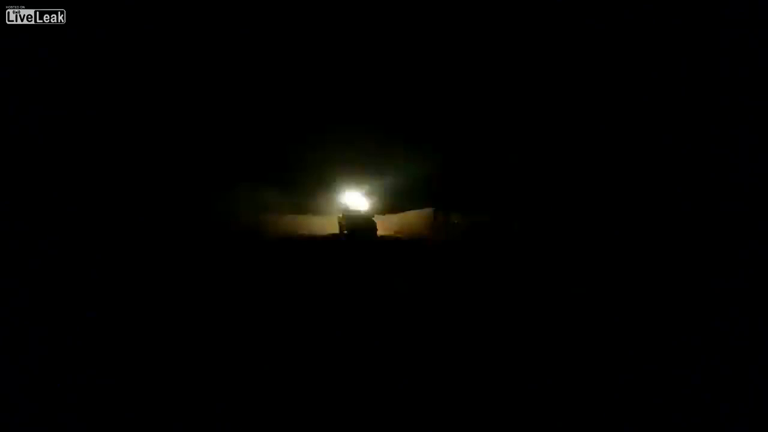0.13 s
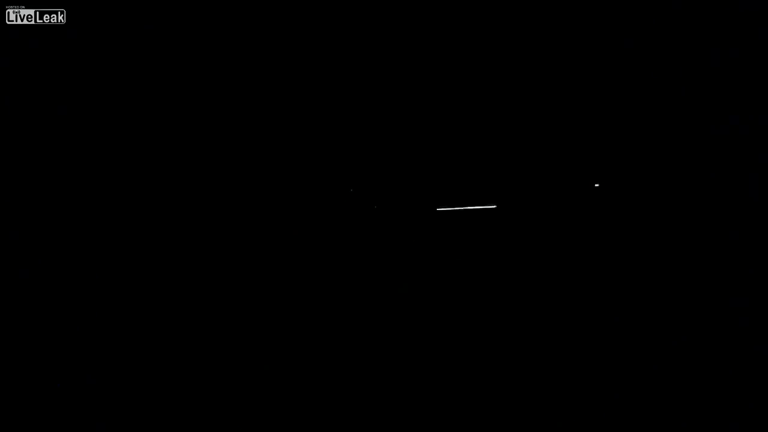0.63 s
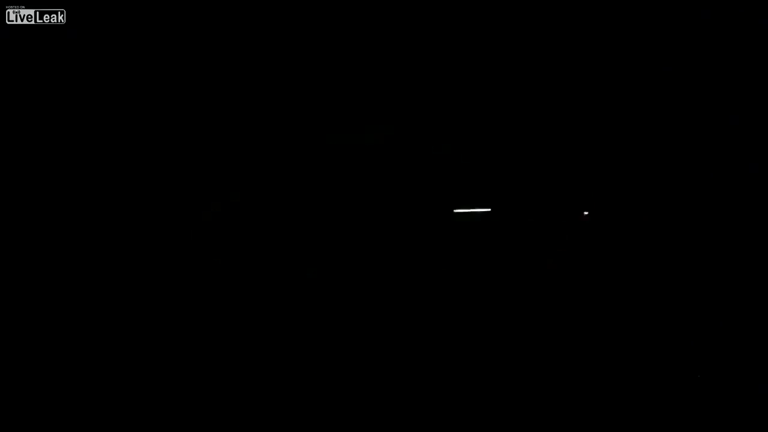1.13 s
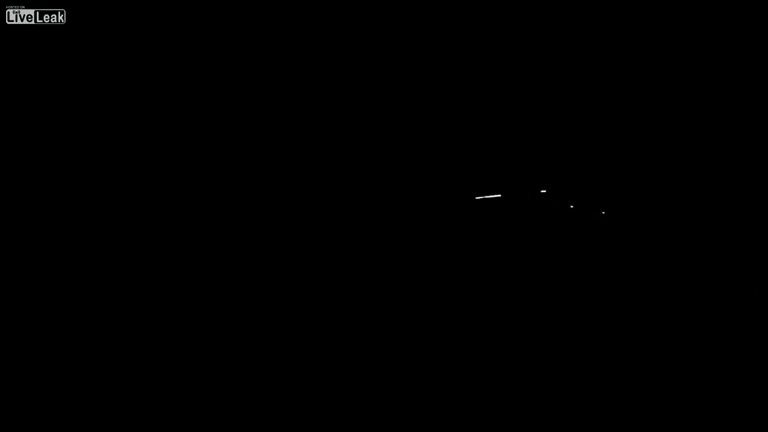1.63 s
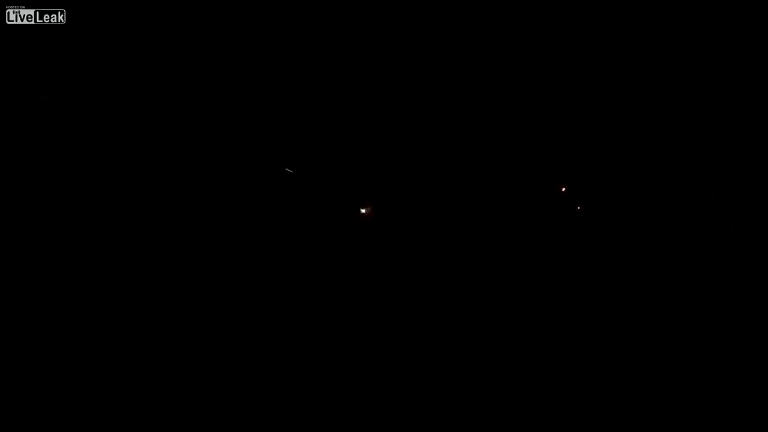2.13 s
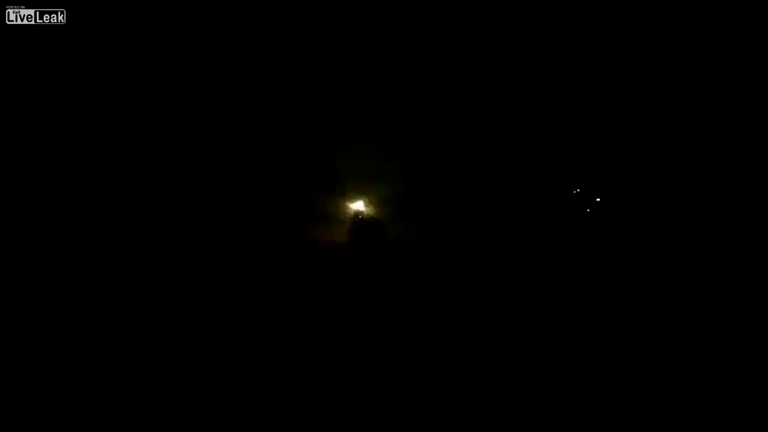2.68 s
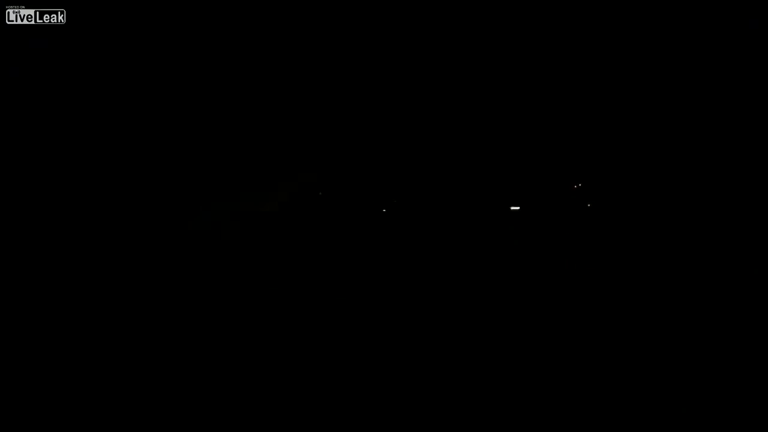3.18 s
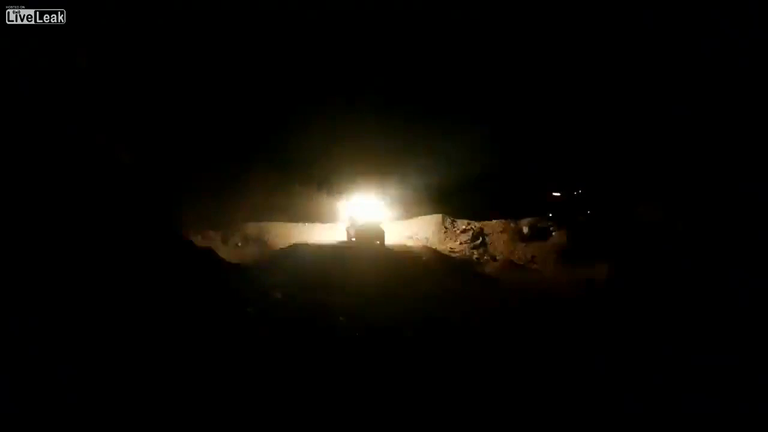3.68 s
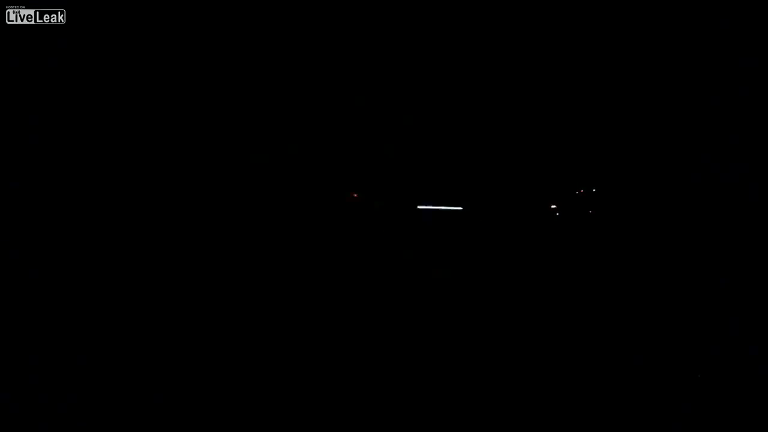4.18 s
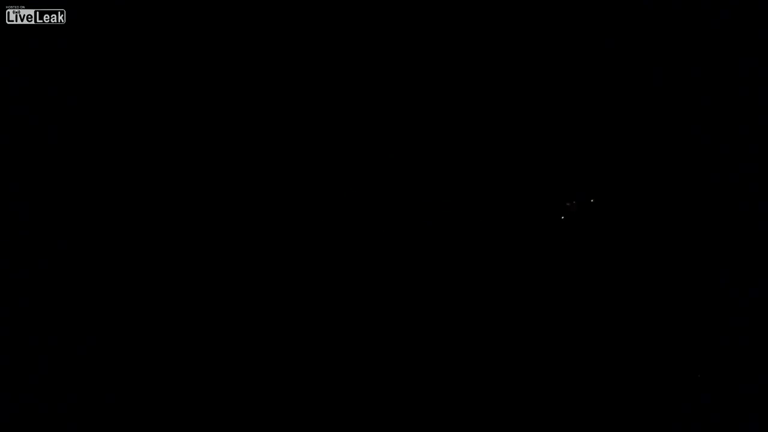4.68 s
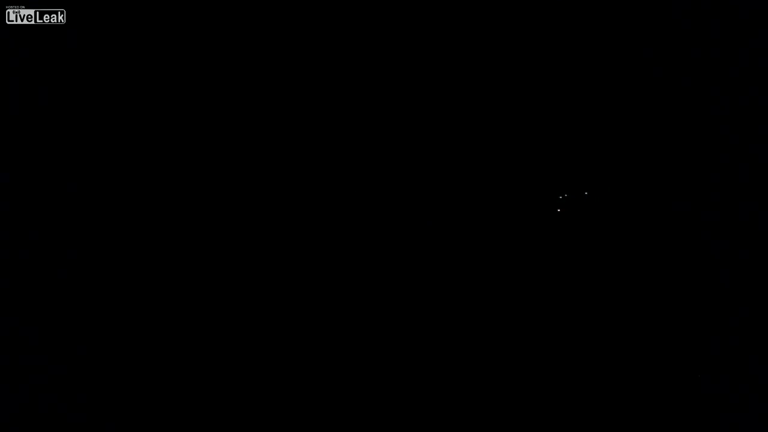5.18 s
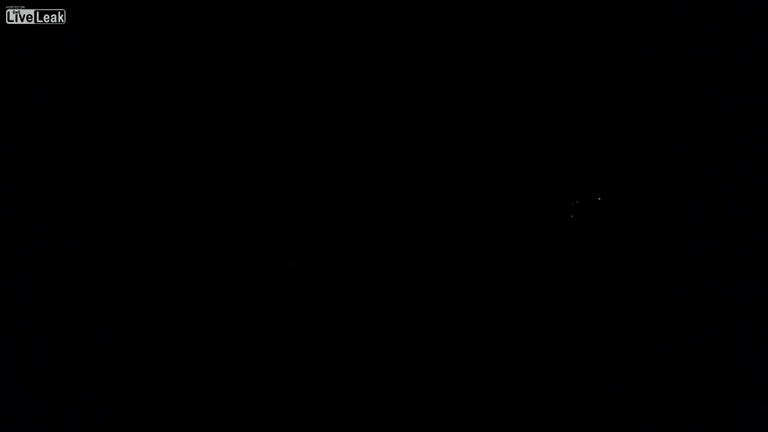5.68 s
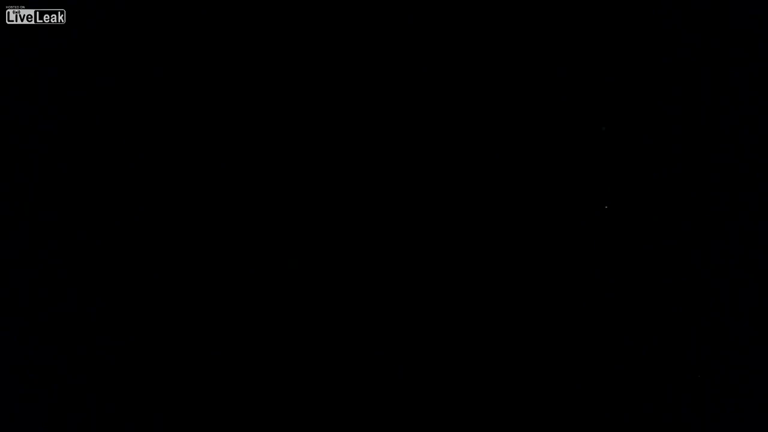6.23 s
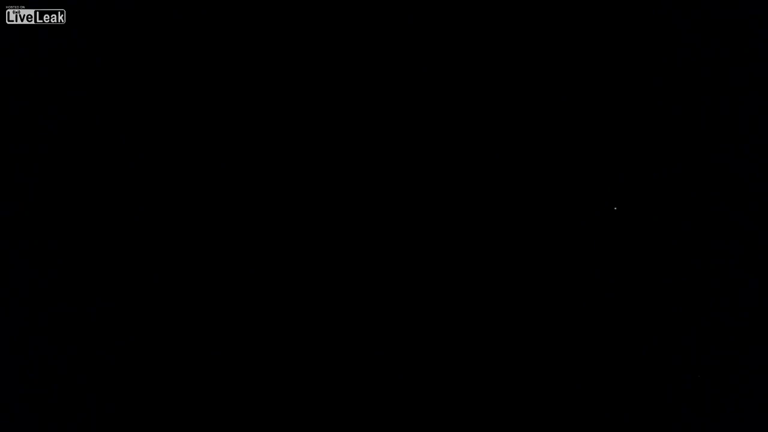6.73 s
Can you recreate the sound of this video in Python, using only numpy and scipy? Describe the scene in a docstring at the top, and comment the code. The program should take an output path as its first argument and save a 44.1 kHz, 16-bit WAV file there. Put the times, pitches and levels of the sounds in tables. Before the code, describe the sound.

A close machine gun on a vehicle hammers steadily in open dark country, blasts slightly uneven in strength and tone, overlapping with slapback from banks and distant faces. The mono microphone overloads and clamps the peaks, with thin bass. After the last round a noisy echo decays over a couple of seconds into quiet night air and light hiss, with tiny brass ticks, then a single muffled far-off shot.

```python
"""A machine gun fires one long burst in the open at night, near a microphone with hard gain control.
Each blast rings the gun pit's low modes, and near banks excite them again; noise bands that die in
three stages form the echo of ground, slope and valley, and far faces return short noisy cracks.
Spent cases tick and ring as the echo fades, then another gun fires once far away: a dulled N-wave."""
import sys
import numpy as np
from scipy import signal
from scipy.fft import rfft, irfft, next_fast_len
from scipy.io import wavfile

SR = 44100
rng = np.random.default_rng(int(sys.argv[2]) if len(sys.argv) > 2 else 0)


def transcribe(signal):
    """Save signal, clipped to [-1, 1], as a 16-bit WAV file at the path in sys.argv[1]."""
    frames = np.atleast_2d(signal).T
    limited = np.clip(frames, -1, 1)
    pcm = np.round(limited * 32767).astype(np.int16)
    wavfile.write(sys.argv[1], SR, pcm)


def invert_db(level):
    """Linear amplitude ratio for a level in decibels (20 dB per decade), elementwise."""
    return 10 ** (np.asarray(level, dtype=float) / 20)


N = 301725

# muzzle blasts of the burst: start_s, level_db
BLASTS = [(0.263, -2.5), (0.3592, -6.5), (0.458, -8.5), (0.5605, -9), (0.6538, -9.5), (0.7466, -7.5),
          (0.845, -4.5), (0.9427, -6), (1.0405, -2), (1.1355, -6), (1.2323, -5.5), (1.3272, -8),
          (1.4228, -4), (1.519, -2), (1.6159, -4.5), (1.712, -8), (1.809, -6), (1.9024, -5), (1.9905, -8),
          (2.0882, -7.5), (2.1798, -8), (2.2678, -6.5), (2.359, -11), (2.4478, -6), (2.5429, -2.5),
          (2.6352, -4.5), (2.7309, -4), (2.827, -7), (2.9245, -5), (3.0154, -4.5), (3.104, -7.5),
          (3.1966, -2), (3.29, -5.5), (3.3819, -6), (3.479, -6.5), (3.5751, -4), (3.6659, -7), (3.7597, -1),
          (3.8476, -6), (3.9355, -3.5), (4.031, -6.5), (4.1237, -8.5), (4.2175, -6.5), (4.3123, -7.5)]
# edges of the colour regions: boom lies between the first two, bark between the last two
COLOUR_HZ = (240, 500, 1100)


def band(x, low_hz, high_hz):
    """Band-limiting: the power of white noise is proportional to bandwidth, so rms 1 is restored."""
    low, high = np.clip([low_hz, high_hz], 15, .45 * SR)
    y = signal.sosfilt(signal.butter(3, [low, high], "band", fs=SR, output="sos"), x)
    return y / np.sqrt(2.2 * (high - low) / SR)


def clicks(seconds, db):
    """Impulsive excitation: single samples at given times and levels."""
    out = np.zeros(N)
    places = np.minimum(np.round(np.asarray(seconds) * SR).astype(int), N - 1)
    np.add.at(out, places, invert_db(db))
    return out + 1e-18


def ring(x, hz, t60):
    """Damped resonance: a unit click sets a sine of initial height 1 ringing for t60 seconds."""
    radius, angle = invert_db(-60 / (t60 * SR)), 2 * np.pi * hz / SR
    return signal.lfilter([0, np.sin(angle)], [1, -2 * radius * np.cos(angle), radius ** 2], x)


def dying_power(x, t60):
    """Energy decay: the powers of incoherent arrivals add up and die exponentially."""
    return signal.lfilter([1], [1, -invert_db(-120 / (t60 * SR))], x ** 2)


def shaped_noise(spectrum):
    """Stationary noise: white noise weighted by a spectrum and scaled to rms 1."""
    hz, db = np.transpose(spectrum)
    size = next_fast_len(N)
    log_hz = np.log(np.arange(size // 2 + 1) * SR / size + 1)
    gain = invert_db(np.interp(log_hz, np.log(hz), db))
    out = irfft(rfft(rng.standard_normal(size)) * gain, size)[:N]
    return out / np.std(out)


def drift(rate_hz):
    """Slow random modulation: white noise through two equal low-pass poles, scaled to spread 1."""
    pole = np.exp(-2 * np.pi * rate_hz / SR)
    slow = signal.lfilter([1], [1, -2 * pole, pole ** 2], rng.standard_normal(N + SR))[SR:]
    return slow / np.std(slow)


def lumps(rate_per_s, decay_s, share):
    """Shot noise: a power gain of mean 1 of which a share comes in random dying lumps."""
    grains = (rng.random(N) < rate_per_s / SR) * rng.exponential(1, N)
    lumpy = signal.lfilter([1], [1, -np.exp(-1 / (decay_s * SR))], grains)
    return 1 + np.clip(share, 0, 1) * (lumpy / lumpy.mean() - 1)


def aimed():
    """Directivity: boom and bark follow the barrel's aim; the hiss is steadier than the blast."""
    # the barrel swings across the pit: start_s, boom_db (above the blast)
    aim = [(.26, 0.5), (0.7, 3.5), (1.2, -0.5), (1.7, 4.5), (2.15, 2), (2.25, 1.5), (2.4, 0), (2.9, 2.5),
           (3.05, -3), (3.6, -6.5), (4.0, 1), (4.3, 0)]
    usual_db = -7.3   # blast of a usual round
    s, db = np.transpose(BLASTS)
    boom_db = np.interp(s, *np.transpose(aim))
    bark_db = 0.45 - 0.33 * boom_db   # the bark gains part of what the boom loses
    hiss_db = 0.6 + (0.74 - 1) * (db - usual_db)   # hiss keeps 0.74 of a round's extra decibels
    return s, db, boom_db, bark_db, hiss_db


def night_air():
    """Ambient noise: a steady random pressure with a sloping spectrum."""
    # spectrum of the night air: frequency_hz, relative_db_per_hz
    night = [(24, -73), (40, -3), (129, 2.5), (253, -6.5), (560, -2.5), (900, 0), (2100, -6.5),
             (2600, -18.5), (3340, -21), (3780, -30), (4760, -25), (6000, -56), (7800, -74), (13200, -120)]
    return invert_db(-39.5) * shaped_noise(night)


def action():
    """Impact noise: parts touch faintly, then the bolt slams home; each excites a dying noise band."""
    # parts of the action touch before firing: start_s, level_db
    touches = [(0.1338, -44), (0.1717, -43), (0.195, -40), (0.2166, -36), (0.234, -36)]
    rattle_t60_s, bolt_t60_s = 0.26, 0.33
    bolt_s, bolt_db = .2487, -14.5
    rattle = np.sqrt(dying_power(clicks(*np.transpose(touches)), rattle_t60_s))
    slam = np.sqrt(dying_power(clicks([bolt_s], bolt_db), bolt_t60_s))
    rattle_noise = band(rng.standard_normal(N), 2720, 8800)
    slam_noise = band(rng.standard_normal(N), 686, 8700)
    return rattle * rattle_noise + slam * slam_noise


def boom():
    """Modal resonance: each round, and each return from the banks, sets the gun pit ringing."""
    # rings of the gun pit: frequency_hz, level_db, t60_s
    pit_modes = [(208.7, 12, 0.081), (252, -2, 0.15), (298.7, 4, 0.11), (322.7, 7.5, 0.13), (449, 6, 0.092),
                 (666, 7.5, 0.091), (750, 8.5, 0.057), (929, 7.5, 0.043), (1398, 4, 0.1),
                 (1925, 9.5, 0.038)]
    # near banks that repeat the boom: delay_s, level_db
    banks = [(.019, -19), (.031, -9), (.041, -2), (.061, -7.5), (.072, -10), (.13, -7), (.17, -13),
             (.22, -5), (.27, -8)]
    mode_spread_db = 3.5   # no two rounds shake the pit alike
    bank_loss_db_per_octave, bank_dull_hz = 3, 330   # earth banks swallow the upper rings
    s, db, boom_db, bark_db, _ = aimed()
    out = np.zeros(N)
    chance_db = rng.normal(0, mode_spread_db, (len(s), len(pit_modes)))
    for k, (hz, level_db, t60) in enumerate(pit_modes):
        colour_db = (0, boom_db, bark_db, 0)[np.searchsorted(COLOUR_HZ, hz)]
        struck_db = db + colour_db + level_db + chance_db[:, k]
        loss_db = bank_loss_db_per_octave * max(np.log2(hz / bank_dull_hz), 0)
        returns = sum(clicks(s + lag, struck_db + bank_db - loss_db) for lag, bank_db in banks)
        out += ring(clicks(s, struck_db) + returns, hz, t60)
    return out


def gas_puffs(s, hiss_db):
    """Repeated excitation: gas and the cycling action renew the hiss of each round."""
    # renewals of the hiss: delay_s, level_db
    puffs = [(.0001, -4.5), (.0015, 2), (.003, -2.5), (0.01, -1), (0.023, -4.5), (.031, -29.5),
             (.052, -20.5)]
    late_s = rng.normal(0, 0.00051, (len(s), len(puffs)))
    uneven_db = rng.normal(0, 1.8, (len(s), len(puffs)))
    out = np.zeros(N)
    for k, (lag, puff_db) in enumerate(puffs):
        start = s + lag + late_s[:, k] * (lag > .005)   # only the later puffs vary in time
        out += clicks(start, hiss_db + puff_db + uneven_db[:, k])
    return out


def scatter():
    """Diffuse scattering: each half-octave band dies in three stages: near ground, slope, valley."""
    # scattered sound: frequency_hz, near_db, near_t60_s, slope_db, slope_t60_s, valley_db, valley_t60_s
    land = np.transpose([(49.4, -13, 0.77, -8, 1.5, -20.5, 2.4), (90.3, -15, 0.76, -11.5, 6.6, -21, 2.9),
                         (178, 11, 0.15, -3, 1.8, -35.5, 5.9), (384, 2.5, 0.83, -1.5, 0.97, -18, 3.15),
                         (785, 7, 0.19, -2.5, 1.6, -16, 3.83), (1300, 1.5, 0.5, -5, 1.6, -12.5, 3.4),
                         (2540, 1.5, 0.1, -4, 0.88, -5.5, 2.41), (3870, 4.5, 0.35, -4, 2.1, -26.5, 2.2),
                         (5210, -0.5, 0.23, -16, 1.5, -21, 2.1), (7120, -6.5, 0.14, -2.5, 0.72, -45, 1.2),
                         (9660, 2.5, 0.13, -15, 0.49, -40, 3.4), (15310, -4.5, 0.11, -27, .7, -85, 2.5)])
    same_below_hz = 2060   # well below this every round scatters alike, above it the air stirs each anew
    slope_ends_s, swell_s = .56, .03   # the slope stops at a crest; time constant of the far swell
    s, db, boom_db, bark_db, hiss_db = aimed()
    coloured = [clicks(s, db + colour_db) for colour_db in (0, boom_db, bark_db, 0)]
    bright = gas_puffs(s, db + hiss_db)
    grit = lumps(450, 0.00086, 0.33)   # stones and edges return separate grains
    clatter = lumps(68, 0.0055, 0.4)   # rocks on the slope return rough bursts
    # broken ground makes the echo roll: a power gain, spreads in dB
    roll = 10 ** ((0.52 * drift(3.5) + 0.8 * drift(23.0)) / 10)
    edges = 40 * 2 ** np.arange(0, 9.1, .5)
    white = rng.standard_normal((2, N))
    ground, t = rng.standard_normal((2, SR // 2)), np.arange(SR // 2) / SR
    out, answers = np.zeros(N), np.zeros((len(coloured), SR // 2))
    crest = round(slope_ends_s * SR)
    swell = np.exp(-1 / (swell_s * SR))
    for k, (low, high) in enumerate(zip(edges, edges[1:])):
        hz = np.sqrt(low * high)
        near_db, near_t60, slope_db, slope_t60, valley_db, valley_t60 = [
            np.interp(np.log(hz), np.log(land[0]), column) for column in land[1:]]
        same = 1 / (1 + (hz / same_below_hz) ** 2)
        near_answer = band(ground[k % 2], low, high) * invert_db(near_db - 60 * t / near_t60)
        part = np.searchsorted(COLOUR_HZ, hz)
        answers[part] += np.sqrt(same) * near_answer
        hill = dying_power(coloured[part], slope_t60)
        # each round's slope echo ends at the crest
        hill[crest:] -= invert_db(-120 * crest / SR / slope_t60) * hill[:-crest].copy()
        slope_power = invert_db(2 * slope_db) * np.maximum(hill, 0)
        valley_power = invert_db(2 * valley_db) * dying_power(coloured[part], valley_t60)
        # far ground answers late, so its share swells first
        far = signal.lfilter([1 - swell], [1, -swell], (slope_power, valley_power))
        power = far[0] * clatter + far[1] * roll
        power += (1 - same) * invert_db(2 * near_db) * dying_power(bright, near_t60) * grit
        out += band(white[k % 2], low, high) * np.sqrt(power)
    for blasts, answer in zip(coloured, answers):
        out += signal.fftconvolve(blasts, answer)[:N]
    return out


def far_faces():
    """Rough reflection: a face smears the shock over milliseconds into a short noisy crack."""
    # the front of each round, then far faces that return it as a short crack:
    # delay_s, frequency_hz, width_hz, level_db, half_length_s
    faces = [(.0001, 1300, 2400, 14, 0.0035), (.4055, 1900, 3000, 2, 0.0066),
             (.4345, 2230, 1200, 9, 0.0035), (.461, 2200, 1500, -6, 0.0024), (.511, 1300, 1500, -7, 0.0051),
             (.799, 1800, 1800, -23, .004), (.151, 1600, 1450, 0, 0.0017), (.187, 1600, 1000, -3, 0.021)]
    s, db = np.transpose(BLASTS)
    out, chance_db = np.zeros(N), rng.normal(0, 1.2, (len(s), len(faces)))
    # late in the burst the barrel turns to the far faces: 20 dB per second from 4.13 s
    facing_db = 20 * np.maximum(s - 4.13, 0)
    for k, (lag, hz, width_hz, face_db, half_length) in enumerate(faces):
        level_db = db + face_db + chance_db[:, k] + facing_db * (k > 0)
        window = np.hanning(round(2 * half_length * SR)) ** .5
        gate = signal.fftconvolve(clicks(s + lag, level_db), window)[:N]
        out += band(gate * rng.choice([-1., 1.], N), hz - width_hz / 2, hz + width_hz / 2)
    return out


def cases():
    """Modal impact: each spent case ticks on the ground and rings its modes with strengths of its own."""
    # spent cases land: start_s, ring_db, tick_db (above the ring)
    landings = [(5.384, -53, -1), (5.654, -47, -5), (5.822, -48, -14), (5.901, -54.5, 5), (6.02, -54, -8)]
    # modes of a case: frequency_hz, level_db, t60_s
    case_modes = [(4860, -8, .2), (4900, -5, .3), (6200, -12, .25), (6160, -10, .35), (8800, -14, .2)]
    tick_t60_s = .25
    s, db, tick_db = np.transpose(landings)
    chance_db = rng.normal(0, 2.2, (len(s), len(case_modes)))
    tick = np.sqrt(dying_power(clicks(s, db + tick_db), tick_t60_s))
    out = tick * band(rng.standard_normal(N), 2800, 5700)
    for k, (hz, level_db, t60) in enumerate(case_modes):
        out += ring(clicks(s, db + level_db + chance_db[:, k]), hz, t60)
    return out


def far_shot():
    """N-wave propagation: a shock dulled by the air, with ground echoes, a low thump and a short tail."""
    # ground echoes of the far shock: delay_s, level_db
    echoes = [(.0046, 0), (.0095, -6), (.0124, -4), (0.0153, -5), (.0203, -9), (.024, -10), (0.0268, -9)]
    arrival_s, shock_s, shock_db = 6.7781, .0014, -1.5
    soil_hz, air_hz = 700, 2770   # low-pass corners
    tail_db, tail_t60_s = -17.5, 0.24
    thump_hz, thump_db, thump_t60_s = 239, -12.5, 0.086   # the low push of the far muzzle blast
    shock = np.linspace(-1, 1, round(shock_s * SR))
    lag, echo_db = np.transpose(echoes)
    soil = signal.butter(2, soil_hz, fs=SR, output="sos")
    arrivals = clicks([arrival_s], shock_db)
    arrivals += signal.sosfilt(soil, clicks(arrival_s + lag, shock_db + echo_db))
    tail = np.sqrt(dying_power(clicks([arrival_s + .003], tail_db), tail_t60_s))
    tail = tail * band(rng.standard_normal(N), 110, 1475)
    thump = ring(clicks([arrival_s], thump_db), thump_hz, thump_t60_s)
    air = signal.butter(8, air_hz, fs=SR, output="sos")
    return signal.sosfilt(air, np.convolve(arrivals, shock)[:N] + tail + thump)


def scene():
    """Superposition: the pressures of gun, land and night air add at one microphone."""
    mono = night_air() + action() + boom() + scatter() + far_faces() + cases() + far_shot()
    return np.stack([mono, mono])


def capsule(x):
    """Transducer response: the bass is shelved down and a resonance at the port is added."""
    bass_cut_hz, bass_kept_db = 207, -18.5
    port_hz, port_width_hz, port_db = 5390, 670, -1.5
    thin = signal.sosfilt(signal.butter(4, bass_cut_hz, "high", fs=SR, output="sos"), x)
    x = thin + invert_db(bass_kept_db) * (x - thin)
    return x + invert_db(port_db) * signal.lfilter(*signal.iirpeak(port_hz, port_hz / port_width_hz, fs=SR), x)


def gain_control(x):
    """Dynamic compression: level above a threshold is cut, but late, so fronts hit the soft ceiling."""
    threshold_db, release_db_per_s = -11.5, 221   # the excess level is released at this rate
    sense_s, attack_s, settle_s = 0.0076, 0.0016, .09
    squeeze, slow_squeeze = 0.54, 0.32   # shares of the excess that are cut
    ceiling = .9
    sense, fast, slow = np.exp(-1 / (np.array([sense_s, attack_s, settle_s]) * SR))
    level_db = 10 * np.log10(signal.lfilter([1 - sense], [1, -sense], x ** 2) + 1e-12)
    ramp_db = release_db_per_s * np.arange(N) / SR
    over_db = np.maximum.accumulate(np.maximum(level_db - threshold_db, 0) + ramp_db) - ramp_db
    # part of the cut follows each round, part settles over the burst
    cut_db = squeeze * signal.lfilter([1 - fast], [1, -fast], over_db)
    cut_db += slow_squeeze * signal.lfilter([1 - slow], [1, -slow], over_db)
    x = x * invert_db(-cut_db)
    return x / (1 + np.abs(x / ceiling) ** 8) ** (1 / 8)


def hiss():
    """Self-noise: steady hiss that the gain control does not touch."""
    # spectrum of the hiss: frequency_hz, relative_db_per_hz
    hiss_spectrum = [(2940, -53), (5000, -18), (6310, -13.5), (10000, -16), (10900, -14.5), (15500, -14)]
    return invert_db(-59) * shaped_noise(hiss_spectrum)


def low_pass(x):
    """Removes everything above the highest recorded frequency."""
    return signal.sosfilt(signal.butter(12, 15720, fs=SR, output="sos"), x)


def record(dry):
    """Signal chain: capsule, gain control and added hiss act in turn on the one microphone signal."""
    x = gain_control(capsule(dry[0])) + hiss()
    return low_pass(np.stack([x, x]))


dry = scene()
out = record(dry)
transcribe(out)
```